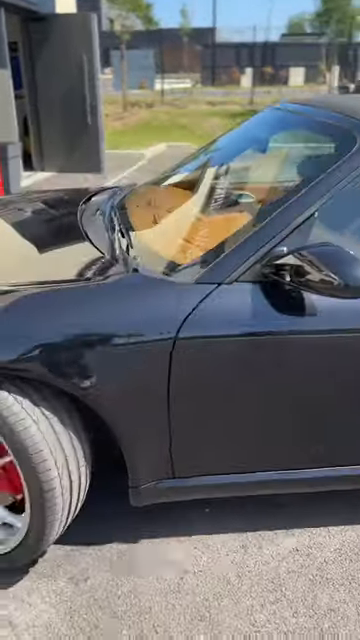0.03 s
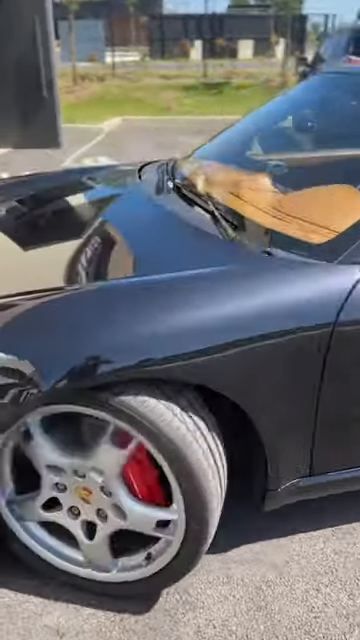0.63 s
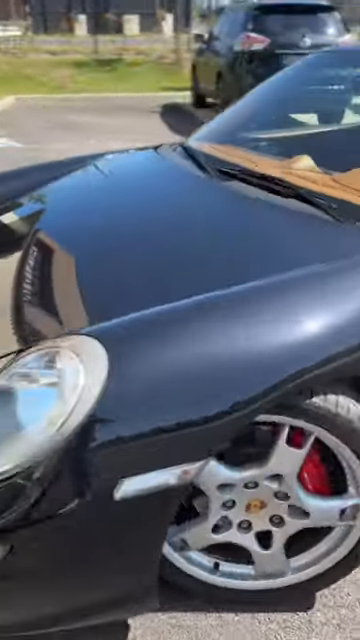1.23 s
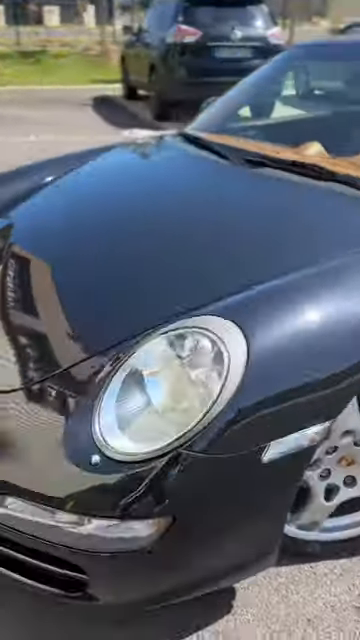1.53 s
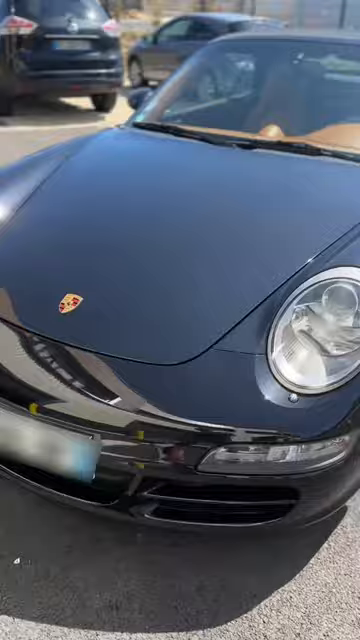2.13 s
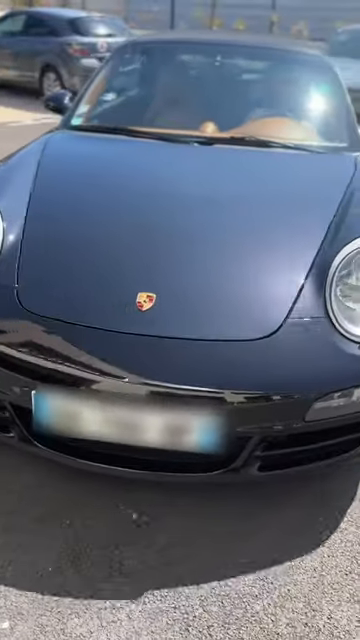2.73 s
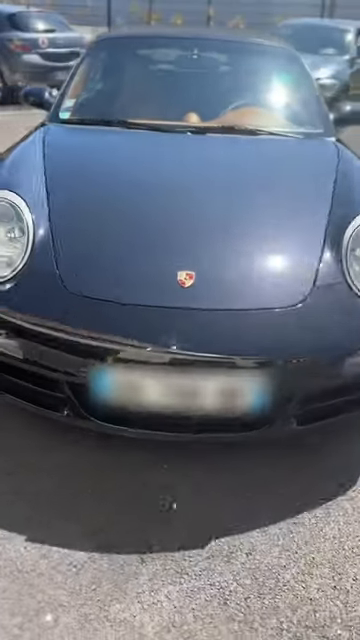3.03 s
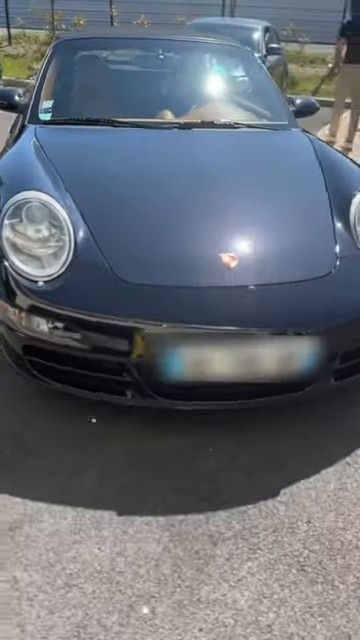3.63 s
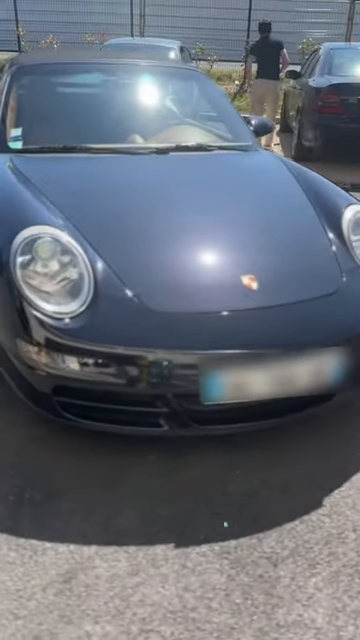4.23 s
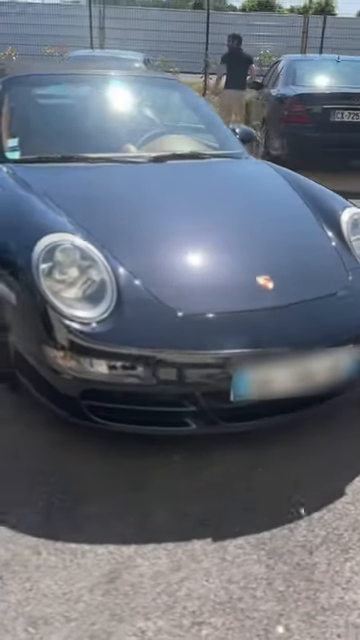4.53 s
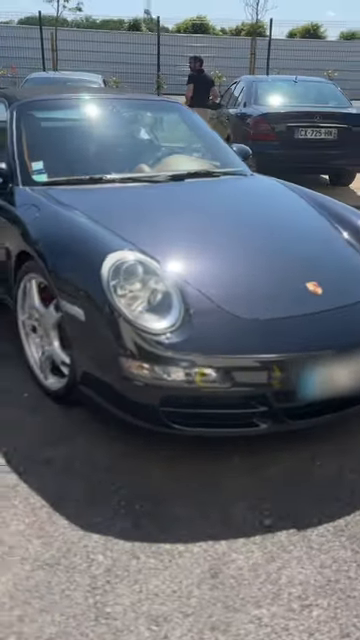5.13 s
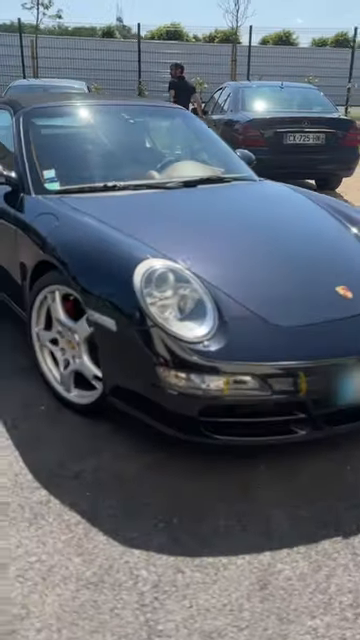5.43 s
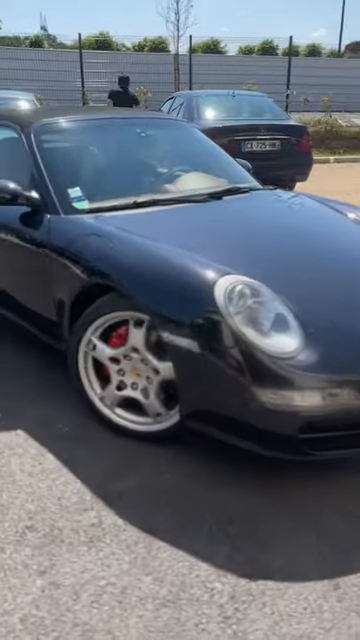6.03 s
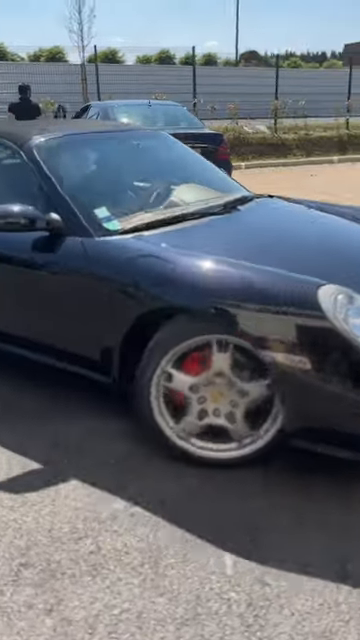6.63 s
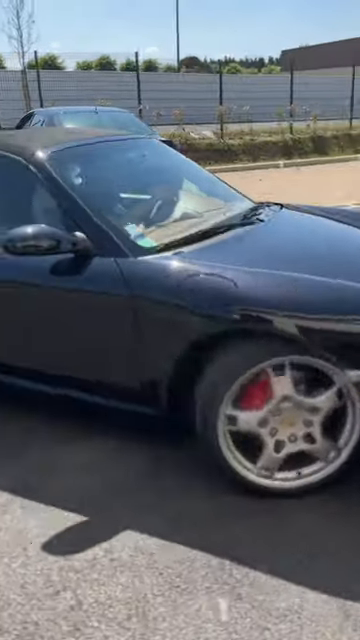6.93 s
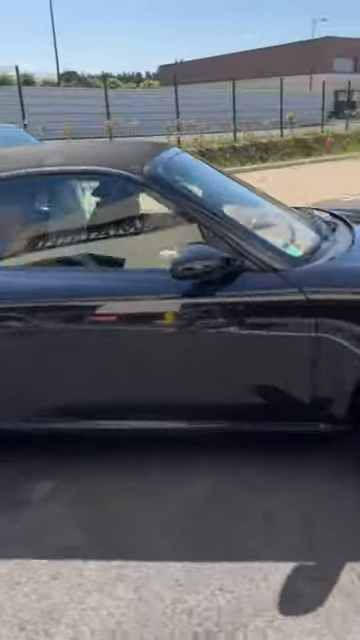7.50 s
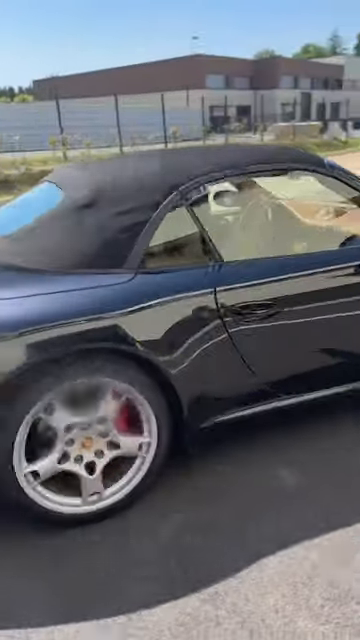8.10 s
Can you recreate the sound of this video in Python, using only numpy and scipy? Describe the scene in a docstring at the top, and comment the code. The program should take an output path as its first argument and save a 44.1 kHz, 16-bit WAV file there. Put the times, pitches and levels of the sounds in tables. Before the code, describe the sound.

A sports car engine idles in an open lot with a deep boom and burbling drone, heard close up by someone walking around it. At about 0.2 seconds it revs briefly, and several loud, thumping exhaust pops follow between 0.6 and 0.9 seconds, with two softer ones by 1.5. The engine sags, recovers and idles evenly until about 4.7, somewhat quieter at the front, with light knocking and a faint fan hum. A shoe scuffs the asphalt at 3.4. At 4.8 a second rev rises quickly and sinks slowly, rasping and spitting. At 6.3 comes the third and highest rev, a spitting bark that peaks around 6.6 and falls back to idle by 7.7. Engine hiss, rapid ticking and a thin whine grow closer near the rear, and grit clicks underfoot at about 8.2 seconds.

```python
"""A flat-six sports car idles in an open lot and is revved three times as the listener walks round its nose.
Two cylinder banks pulse through their pipes: a boom, a burbling drone near 250 Hz, a spitting rasp
under throttle, and pops of unburnt fuel on the overrun. The engine bay hisses, ticks and knocks,
the intake whistles faintly, a fan hums, and a shoe scuffs the gritty asphalt."""
import sys
import numpy as np
from scipy import signal
from scipy.fft import rfft, irfft
from scipy.io import wavfile
from scipy.ndimage import uniform_filter1d, minimum_filter1d

SR = 44100
rng = np.random.default_rng(int(sys.argv[2]) if len(sys.argv) > 2 else 0)


def transcribe(signal):
    """Save signal, clipped to [-1, 1], as a 16-bit WAV file at the path in sys.argv[1]."""
    frames = np.atleast_2d(signal).T
    limited = np.clip(frames, -1, 1)
    pcm = np.round(limited * 32767).astype(np.int16)
    wavfile.write(sys.argv[1], SR, pcm)


N = 368676
T = np.arange(N) / SR
HZ = np.fft.rfftfreq(N, 1 / SR)
IDLE_RPM = 857  # reference speed for levels and roughness

# the walk round the car: time_s, nearness (0 at the nose, 1 beside the rear wheel and the engine)
WALK = [(0, 0.59), (.9, 0.43), (1.6, 0.28), (3, 0.096), (4.65, 0.0052), (5.1, 0.57), (6.2, 0.66),
        (7.1, 0.6), (7.7, 0.85), (8.36, 1)]
# ringing covers and brackets in the engine bay: pitch_hz, width_hz, lift_db
COVER_MODES = [(1110, 22, 6), (1381, 32, 5), (1874, 90, 2), (2130, 54, 2.5), (2790, 94, 2.5), (3090, 35, 6),
               (5670, 23, 4), (6100, 73, 10), (6200, 37, 4.5), (6460, 65, 9.5), (6700, 56, 8),
               (6860, 70, 7), (7510, 180, 3), (8910, 97, 1.5), (10290, 360, 5.5)]


def amp(db):
    """Decibels to gain."""
    return 10 ** (np.asarray(db) / 20)


def curve(rows):
    """A time table as a value at every sample."""
    return np.interp(T, *np.transpose(rows))


def read(points, hz):
    """A table read over log frequency."""
    table_hz, value = np.transpose(points)
    return np.interp(np.log(hz + 1), np.log(table_hz + 1), value)


def response(points, hz):
    """Gain of a spectrum table, falling steeply past both ends."""
    skirts = (1 + (points[0][0] / (hz + 1)) ** 4) * (1 + (hz / points[-1][0]) ** 4)
    return amp(read(points, hz)) / skirts


def coloured(points, modes=()):
    """Two unrelated noises with the given spectrum, lifted at the given resonances."""
    lift_db = sum(db / (1 + (2 * (HZ - hz) / width) ** 2) for hz, width, db in modes)
    return irfft(rfft(rng.standard_normal((2, N))) * response(points, HZ) * amp(lift_db), N)


def ring(x, points, size=16384):
    """Minimum-phase filter: the peaks of the spectrum table ring on after each blow."""
    log_gain = np.log(response(points, abs(np.fft.fftfreq(size, 1 / SR))) + 1e-5)
    taps = np.fft.ifft(np.exp(np.conj(signal.hilbert(log_gain)))).real
    return signal.oaconvolve(x, taps[:size // 2])[:N]


def resonate(x, strength, hz, width_hz):
    """Adds a resonance whose strength changes over time."""
    return x + strength * irfft(rfft(x) / (1 + (2 * (HZ - hz) / width_hz) ** 2), N)


def drift(hz):
    """Random wobble of rms 1, up to about hz."""
    x = irfft(rfft(rng.standard_normal(N)) * np.exp(-(HZ / hz) ** 2), N)
    return x / x.std()


def steadied(pair, size=6000):
    """Brings the slow level at the centre of a stereo pair to 1, keeping its throb."""
    power = uniform_filter1d(uniform_filter1d(pair.mean(0) ** 2, size), size)
    return pair / np.sqrt(abs(power) + 1e-20)


def unit_rms(pair):
    """Brings the centre of a stereo pair to rms 1, keeping its swells."""
    return pair / pair.mean(0).std()


def blend(a, b, share):
    """Equal-power crossfade between unrelated sounds."""
    share = np.clip(share, 0, 1)
    return np.sqrt(1 - share) * a + np.sqrt(share) * b


def stereo(direct, diffuse):
    """The right side hears the sound shifted in phase and shaded, mixed with a diffuse part."""
    # how far the left side leads: frequency_hz, phase_rad
    lead = [(30, -0.04), (70, -0.12), (130, -0.26), (290, 0.48), (520, 1.45), (1200, 2.4), (1650, 6.5),
            (2600, 9), (3400, 10.5), (4130, 11.5), (5000, 9.5), (5900, 12.5), (7500, 12), (11200, 9.5)]
    # how alike the sides are: frequency_hz, likeness (0-1)
    likeness = [(60, 1), (300, 0.99), (520, 0.87), (1200, 0.28), (2500, 0.56), (5000, 0.64), (6800, 1),
                (9000, 0.82), (11500, 1)]
    # left over right: frequency_hz, balance_db
    balance = [(80, 0), (125, -0.6), (250, -1.4), (380, 0.6), (600, 6), (1200, 4.7), (2400, 1), (6000, 0)]
    same = np.clip(read(likeness, HZ), 0, 1)
    lean = amp(read(balance, HZ) / 2)
    left = rfft(direct)
    right = same * left * np.exp(-1j * read(lead, HZ)) + np.sqrt(1 - same ** 2) * rfft(diffuse)
    return irfft(np.array([left * lean, right / lean]), N)


def loudness(controls, idle_db, load_db, octave_db, near_db, lag_s=0):
    """Gain from idle at the nose, plus dB for full load, each doubling of speed and full nearness."""
    load, octaves, near = controls
    late_load = np.interp(T - lag_s, T, load)
    return amp(idle_db + load_db * late_load + octave_db * octaves + near_db * near)


def crank_speed(ease_s=0.042):
    """The revs climb, sag below idle and recover; the flywheel rounds off every change."""
    # crank speed: time_s, speed_rpm
    revs = [(0, 735), (0.15, 800), (0.3, 1118), (0.46, 1268), (0.65, 1215), (0.8, 935), (1.0, 715),
            (1.22, 612), (1.58, 786), (1.85, 745), (2.25, 787), (3.1, 791), (4.68, 768), (4.79, 930),
            (4.93, 1350), (5.01, 1413), (5.54, 1303), (5.7, 1183), (6.15, 965), (6.3, 1070), (6.48, 1820),
            (6.61, 2055), (6.79, 1890), (6.93, 1570), (7.27, 1050), (7.7, 796), (8.03, 652), (8.36, 722)]
    return uniform_filter1d(curve(revs), round(ease_s * SR))


def throttle(release_s=0.053):
    """Engine load, 0-1: it ramps up with each blip and dies away after the throttle shuts."""
    # presses of the accelerator: start_s, ramp_s, release_at_s, opening (0-1)
    blips = [(0.175, 0.14, 0.66, 0.86), (4.808, 0.085, 4.94, 0.47), (6.311, 0.091, 6.54, 0.94)]
    return sum(opening * np.clip((T - start) / ramp, 0, 1) * np.exp(-np.maximum(T - end, 0) / release_s)
               for start, ramp, end, opening in blips)


def pipes(rpm, firings, jitter=0.052, turbulence=0.11, rebound=0.92, near_bank=0.37):
    """The two banks fire in turn into the pipes, each pulse with a puff of turbulent gas."""
    # uneven combustion at idle speed: time_s, scatter (0-1)
    roughness = [(0, 0.44), (.7, 0.35), (1.2, 0.27), (1.7, 0.16), (4.6, 0.19), (5, 0.18), (8.36, 0.19)]
    # strength of each cylinder in firing order: level_db
    cylinders = [-0.8, 1.4, -1.5, 1.2, -2, 0.06]
    # how much unevenness gets through the silencer: frequency_hz, gain_db
    uneven_colour = [(35, -9), (52, -7), (70, -2), (95, -7), (125, -7.5), (215, -5), (240, -2), (258, -5),
                     (285, -1), (320, 1), (600, -4)]
    # exhaust response to what both banks share: frequency_hz, gain_db
    shared_colour = [(22, -40), (36, 1), (50, 10), (68, 1), (82, 0.5), (100, 2), (120, 1), (142, -0.5),
                     (165, -12), (205, -9), (248, -4), (290, -7), (335, -20.5), (410, -32), (500, -8),
                     (550, -19.5), (605, -21), (900, -39.5)]
    # exhaust response to their difference: frequency_hz, gain_db
    difference_colour = [(25, -45), (52, -1), (75, -9.5), (141, -4.5), (152, -15), (167, -4), (205, -10),
                         (225, -3), (239, 6), (253, 8.5), (274, 0.5), (296, -5.5), (325, -20.5), (355, -14),
                         (400, -39.5), (460, -21), (520, -15.5), (560, -29.5), (900, -38.5)]
    rough = curve(roughness) * (IDLE_RPM / rpm) ** 0.55  # smoother as the revs rise
    at = np.flatnonzero(np.diff(np.floor(firings))) + 1
    order = np.floor(firings[at]).astype(int)
    strength, lateness = rng.standard_normal((len(at), 2)).T
    # a weak firing leaves fuel for the next
    strength = (strength - rebound * np.roll(strength, 1)) / np.hypot(1, rebound)
    side = (-1.) ** order * (1 + near_bank * curve(WALK)[at] ** 2)  # one bank stands out beside the car
    size = amp(np.take(cylinders, order % len(cylinders))) * np.array([np.ones(len(at)), side])
    late = jitter * rough[at] * lateness / np.gradient(firings)[at]
    jittered_at = np.clip(at + np.round(late).astype(int), 0, N - 1)
    even = np.zeros((2, N))
    even[:, at] = size
    uneven = turbulence * rough * np.exp(-(firings % 1)) * rng.standard_normal((2, N))
    uneven[:, jittered_at] += size * (1 + rough[at] * strength)
    shared, difference = even + irfft(rfft(uneven - even) * amp(read(uneven_colour, HZ)), N)
    return ring(shared, shared_colour) + ring(difference, difference_colour)


def silencer(x, chambers=((85, 45), (262, 55), (540, 70))):
    """Chambers (pitch_hz, width_hz) hold each pulse back, smearing it without changing its colour."""
    lag = sum(2 * np.arctan(2 * (HZ - hz) / width) for hz, width in chambers)
    return irfft(rfft(x) * np.exp(-1j * lag), N)


def exhaust_note(rpm, firings, controls, echo_s=0.021, crossovers_hz=(90, 200, 400)):
    """Boom, growl, drone and overtones swell as harmonics of the firing cross the pipe resonances."""
    # the boom along the walk: time_s, gain_db
    boom_ride = [(0, 1.5), (.25, 1), (.33, 0.5), (.45, 2), (.68, 5), (.9, 0.5), (1.3, 0), (1.7, 2.5),
                 (4.65, -1), (4.86, 2.5), (5.1, 0.5), (6.2, 2.1), (6.55, -1), (7.3, 1), (8.36, 1.5)]
    # the drone coming and going: time_s, gain_db
    drone_ride = [(0, -1), (.4, -4), (1.15, 0), (1.6, 2.5), (4.6, 0), (4.87, -1), (5.0, 3.5), (5.4, 2.5),
                  (5.9, 2), (6.2, -6.5), (6.6, 0), (7.05, 1.5), (7.2, -3.5), (7.5, -6), (8.2, -1.5)]
    # resonance of the gap under the nose: time_s, strength
    nose_gap = [(1.2, 0), (1.7, 1.5), (2.8, 2.5), (4.5, 1.26), (5, 0.5), (6.1, 1), (6.35, 0)]
    # higher resonance of the drone along the flank: time_s, strength
    flank = [(0, 0), (1.2, 0), (4.6, 0.12), (5.6, 0.1), (6.1, 0.49), (6.6, 1.25), (7.1, 0), (7.6, 0.63),
             (8.3, 0.9)]
    pulses = silencer(pipes(rpm, firings))
    echo = np.interp(T - echo_s, T, pulses)  # off the cars parked alongside
    spectrum = rfft(stereo(pulses, echo))
    lowpasses = [1 / (1 + (HZ / hz) ** 14) for hz in crossovers_hz]
    bands = np.diff([0 * HZ, *lowpasses, 1 + 0 * HZ], axis=0)
    boom, growl, drone, overtones = (unit_rms(irfft(spectrum * band, N)) for band in bands)
    growl = resonate(growl, curve(nose_gap), hz=115.2, width_hz=11.7)
    drone = resonate(drone, curve(flank), hz=300, width_hz=33)
    boom *= loudness(controls, idle_db=-25, load_db=9, octave_db=-7, near_db=11.5)
    growl *= loudness(controls, idle_db=-29, load_db=8.5, octave_db=2.3, near_db=7)
    drone *= loudness(controls, idle_db=-22.5, load_db=0.5, octave_db=3, near_db=2.5)
    overtones *= loudness(controls, idle_db=-43.5, load_db=9, octave_db=8, near_db=4, lag_s=0.1)
    return boom * amp(curve(boom_ride)) + growl + drone * amp(curve(drone_ride)) + overtones


def rasp(rpm, firings, controls, puff=0.14, hollow_rpm=1100):
    """Gas puffs from the tailpipe, turning hollow as the revs rise and it excites the pipe."""
    # gas noise at the tailpipe: frequency_hz, gain_db
    colour = [(250, -2), (400, -3.5), (510, -3.5), (640, -4), (780, -6), (950, -10), (1500, -26.5)]
    # pipe resonances: pitch_hz, width_hz, lift_db
    pipe_modes = [(451, 39, 4), (491, 27, 6), (532, 36, 8.5), (610, 41, -2)]
    hiss = steadied(stereo(*coloured(colour)))
    hollow = steadied(stereo(*coloured(colour, pipe_modes)))
    gas = blend(hiss, hollow, (rpm - IDLE_RPM) / (hollow_rpm - IDLE_RPM))
    gas *= 1 + puff * np.cos(np.pi * firings)
    return gas * loudness(controls, idle_db=-40, load_db=8, octave_db=3, near_db=8, lag_s=0.035)


def burble(firings, puff=0.47):
    """Gas churns in the silencer, in puffs from the nearer bank."""
    # turbulent gas: frequency_hz, gain_db
    colour = [(225, -12), (255, -7), (295, -0.5), (320, -14), (370, -30)]
    # its resonances: pitch_hz, width_hz, lift_db
    modes = [(240, 11, 1.8), (291.5, 30, 6)]
    # its swells: time_s, level_db
    ride = [(0, -31), (0.3, -28), (0.9, -32), (1.3, -32), (1.7, -38), (4.6, -39), (5, -33), (5.6, -32),
            (6.1, -30), (6.4, -28), (6.6, -32), (7.2, -30), (7.6, -34), (8.36, -33)]
    gas = steadied(stereo(*coloured(colour, modes)))
    return gas * (1 + puff * np.cos(np.pi * firings)) * amp(curve(ride))


def bay_rush(firings, controls, throb=0.062, flutter=0.095, chatter=0.23):
    """Air and rattle in the engine bay throb with the nearer bank; the rattle chatters at each firing."""
    # rushing air: frequency_hz, gain_db
    air_colour = [(400, -28.5), (750, 6.5), (950, -2), (1150, 1), (1550, -6.5), (2000, -6.5), (2700, -6),
                  (4100, -15), (5000, -13.5), (6500, -24.5), (10000, -43.5), (16000, -40)]
    # rattle under load: frequency_hz, gain_db
    rattle_colour = [(500, -28.5), (900, -11.5), (1150, 5), (1500, 0.5), (2100, -4.5), (2400, -8),
                     (4100, -11.5), (5000, -19), (7000, -28), (16000, -44.5)]
    # rattle in the mix: time_s, share (0-1)
    rattle_share = [(0, 0.08), (4.7, 0.1), (5, 0.84), (6.4, 0.4), (6.7, 0.4), (7.15, 0.7), (7.6, 0),
                    (8.36, 0.15)]
    air = steadied(stereo(*coloured(air_colour, COVER_MODES)))
    rattle = steadied(stereo(*coloured(rattle_colour, COVER_MODES)))
    rattle *= 1 + chatter * np.cos(2 * np.pi * firings)
    rush = blend(air, rattle, curve(rattle_share))
    rush *= 1 + throb * np.cos(np.pi * firings) + flutter * drift(21)
    return rush * loudness(controls, idle_db=-45.5, load_db=4, octave_db=2, near_db=13)


def bay_ticks(firings, controls, offset=0.068, rise=0.03, fade=0.17, grain=0.35):
    """The nearer bank ticks once every two firings, standing out of its hiss towards the rear wheel."""
    # bright hiss of the ticks: frequency_hz, gain_db
    colour = [(3000, -17), (5500, -12), (6200, -4.5), (7500, -4), (10000, -4), (12000, -8.5), (15500, -2)]
    age = (firings / 2 - offset) % 1  # in cycles since the last tick
    tick = (1 - np.exp(-age / rise)) * np.exp(-(age / fade) ** 2)
    tick = tick / tick.max() * (1 + grain * drift(400))
    depth = np.interp(curve(WALK), [0, 1], [0.1, 0.76])
    ticking = coloured(colour, COVER_MODES) * (1 - depth + depth * tick)
    gain = loudness(controls, idle_db=-62, load_db=12.5, octave_db=-4, near_db=20.5)
    return steadied(stereo(*ticking)) * gain


def whirr():
    """A hollow whirr from the engine bay, hidden by the car's body once the walk reaches the nose."""
    # band of the whirr: frequency_hz, gain_db
    colour = [(620, -9), (950, 0.5), (1150, -3), (1300, -13)]
    # its resonances: pitch_hz, width_hz, lift_db
    modes = [(740, 30, 7.8), (1030, 30, 5), (1142, 24, 7)]
    # its fade along the first flank: time_s, level_db
    ride = [(0, -43), (0.45, -39.5), (0.9, -43.5), (1.5, -44.5), (2.1, -56)]
    return unit_rms(stereo(*coloured(colour, modes))) * amp(curve(ride))


def fan(waver=0.00401):
    """The cooling fan's blades hum, wavering slightly in pitch."""
    # blade tone and its octave: pitch_hz, level_db
    partials = [(371.5, -45.5), (743, -60.5)]
    # the fan along the walk: time_s, gain_db
    ride = [(0, 1.5), (1.2, 5), (2.1, 2.5), (2.5, -3), (3.15, -4), (3.4, 5), (4.6, 3.5), (5.6, -10),
            (6.3, -3)]
    clock = np.cumsum(1 + waver * drift(6)) / SR
    tone = sum(amp(db) * np.sqrt(2) * np.sin(2 * np.pi * hz * clock) for hz, db in partials)
    tone *= amp(curve(ride))
    return stereo(tone, tone)


def lot_hum(pitch_hz=86, level_db=-34.0, waver=0.0058):
    """A steady low hum from elsewhere in the lot, beating against the idle."""
    clock = np.cumsum(1 + waver * drift(1.94)) / SR
    tone = amp(level_db) * np.sqrt(2) * np.sin(2 * np.pi * pitch_hz * clock)
    return stereo(tone, tone)


def intake(load, level_db=-42):
    """Air whistles faintly through the throttle while it is open."""
    # indrawn air: frequency_hz, gain_db
    colour = [(2200, -3), (2700, -1.5), (3300, -3.5), (4200, -6)]
    # its whistling resonances: pitch_hz, width_hz, lift_db
    modes = [(2470, 80, 6), (2660, 130, 13), (3050, 65, 8), (3240, 80, 9)]
    return amp(level_db) * load * unit_rms(stereo(*coloured(colour, modes)))


def grit_clicks(fade_s=0.0071):
    """Grit snaps under a sole."""
    # single snaps: start_s, level_db
    snaps = [(0.258, -35), (0.694, -28), (1.204, -43), (4.777, -35), (8.079, -32), (8.204, -21)]
    # their sharp colour: frequency_hz, gain_db
    colour = [(1200, -4), (3000, 0), (7000, -4), (11000, -6), (15000, -12)]
    envelope = sum(amp(db) * (T >= start) * np.exp(-abs(T - start) / fade_s) for start, db in snaps)
    grit = stereo(*coloured(colour))
    return envelope * grit / (2 * grit.std())


def bark(firings, controls, flutter=0.22, jitter=0.006):
    """At high revs upper harmonics of the exhaust ring out, each fluttering, all shaken in time together."""
    # partials of the bark: multiple of the firing rate, level_db
    partials = [(4.5, -11.5), (5, -0.5), (5.5, -12), (6, 1.5), (6.5, -13.5), (7, -9.5), (7.5, -14)]
    phase = 2 * np.pi * (firings + jitter * drift(60))
    tones = sum(amp(db) * (1 + flutter * drift(45)) * np.cos(multiple * phase)
                for multiple, db in partials)
    gain = loudness(controls, idle_db=-66.5, load_db=13, octave_db=27.5, near_db=-2, lag_s=0.12)
    return unit_rms(stereo(tones, tones)) * gain


def spits(rise_s=0.005, fade_s=0.01, ragged_rad=0.56):
    """Hard firings spit out of the tailpipe, ringing it for a few ragged cycles."""
    # hard firings: peak_s, level_db, pitch_hz
    hits = [(0.452, -22, 697), (0.59, -21, 470), (5.018, -16.5, 519), (5.11, -23, 472), (5.375, -18.5, 520),
            (5.48, -21.5, 510), (5.66, -23, 472), (6.105, -23.5, 710), (6.415, -16, 550), (6.447, -16, 545),
            (6.482, -13, 582), (6.517, -15, 530), (6.558, -16.5, 635), (6.865, -17, 507)]
    ragged = ragged_rad * drift(150)
    out = np.zeros(N)
    for peak_s, db, hz in hits:
        age = T - peak_s
        envelope = np.exp(-np.maximum(-age / rise_s, age / fade_s))
        out += amp(db) * envelope * np.sin(2 * np.pi * hz * age + ragged)
    return stereo(out, out)


def pops(fade_s=0.018, rise_cycles=0.5, gas=0.48):
    """Unburnt fuel pops in the pipe: a thump of a cycle or two, with a short burst of gas."""
    # pops on the overrun: start_s, level_db, pitch_hz
    hits = [(0.584, -10.5, 125), (0.605, -6.5, 140), (0.713, -4, 165), (0.756, -2.5, 134),
            (0.84, -5.5, 166), (0.859, -7, 174.5), (1.114, -11.5, 67.5), (1.475, -12.5, 80)]
    # the burst of gas: frequency_hz, gain_db
    colour = ((70, -4), (180, 0), (280, -3), (380, -7), (500, -24), (1200, -42))
    out = np.zeros(N)
    for start, db, hz in hits:
        age = np.maximum(T - start, 0)
        swell = age * hz / rise_cycles
        thump = -np.sin(2 * np.pi * hz * age) * swell * np.exp(1 - swell)
        burst = ring((T >= start) * np.exp(-age / fade_s) * rng.standard_normal(N), colour)
        pop = thump + gas * burst / abs(burst).max()
        out += amp(db) * pop / abs(pop).max()
    return stereo(out, out)


def knocking(firings, rise=0.06, fade=0.25, scatter_db=4):
    """The nearer bank knocks once every two firings, never twice alike."""
    # body of the knock: frequency_hz, gain_db
    colour = [(540, -5), (680, 0), (820, -4), (1000, -14)]
    # it comes forward at the nose: time_s, level_db
    ride = [(1, -60), (1.7, -48), (3.2, -47), (4.4, -58)]
    age = firings / 2 % 1  # in cycles since the last knock
    blows = (1 - np.exp(-age / rise)) * np.exp(-age / fade) * amp(scatter_db * drift(14))
    return unit_rms(stereo(*coloured(colour) * blows)) * amp(curve(ride))


def scuff(peak_s=3.397, level_db=-27.5, rise_s=0.006, fade_s=0.021, grain_db=1.5):
    """A sole drags briefly over grit, catching on single stones."""
    # shoe on asphalt: frequency_hz, gain_db
    colour = [(500, -12), (900, 5), (1300, 1.5), (1800, -4), (2400, -7), (4000, -12.5), (8000, -25),
              (15000, -35)]
    grit = stereo(*coloured(colour)) * amp(grain_db * drift(400))
    age = T - peak_s
    envelope = np.exp(-np.maximum(-age / rise_s, age / fade_s))
    return amp(level_db) * envelope * grit / grit.std()


def exhaust_dip(at_s=6.822, width_s=0.0049):
    """Gain that drops the exhaust out for an instant as the last rev falls on a shut throttle."""
    return 1 - np.exp(-((T - at_s) / width_s) ** 2)


def whine(near, width_hz=55, heard_from=0.8):
    """Thin unsteady tones from the engine bay, heard only beside the rear wheel."""
    # tones of the whine: pitch_hz, level_db
    partials = [(2820, -47), (6030, -50)]
    tones = np.zeros(N)
    for hz, db in partials:
        phase = 2 * np.pi * hz * T
        tones += amp(db) * (drift(width_hz) * np.cos(phase) + drift(width_hz) * np.sin(phase))
    tones *= np.interp(near, [heard_from, 1], [0, 1]) ** 2
    return stereo(tones, tones)


def scene():
    """The engine fires three times a revolution; load, speed and nearness drive its main layers."""
    rpm, near, load = crank_speed(), curve(WALK), throttle()
    firings = np.cumsum(rpm * 3 / 60) / SR + 0.015 * drift(4)  # running count, wandering a little
    controls = load, np.log2(rpm / IDLE_RPM), near
    exhaust = exhaust_note(rpm, firings, controls) + rasp(rpm, firings, controls)
    exhaust += bark(firings, controls) + burble(firings)
    tailpipes = exhaust * exhaust_dip() + pops() + spits()
    engine_bay = bay_rush(firings, controls) + bay_ticks(firings, controls) + knocking(firings)
    engine_bay += intake(load) + whine(near) + whirr() + fan()
    return tailpipes + engine_bay + lot_hum() + scuff() + grit_clicks()


def record(dry, window=200, cutoff_hz=15850):
    """A quick limiter holds the loudest peaks at full scale, then a low-pass trims the top."""
    peak_gain = 1 / np.maximum(abs(dry).max(0), 1)
    limited = dry * uniform_filter1d(minimum_filter1d(peak_gain, window), window)
    lowpass = signal.firwin(511, cutoff_hz, window=("kaiser", 9), fs=SR)
    return signal.oaconvolve(limited, lowpass[None], "same")


dry = scene()
out = record(dry)
transcribe(out)
```